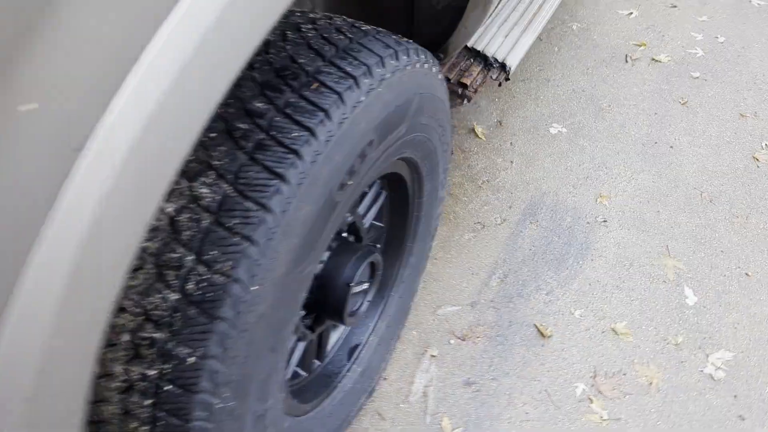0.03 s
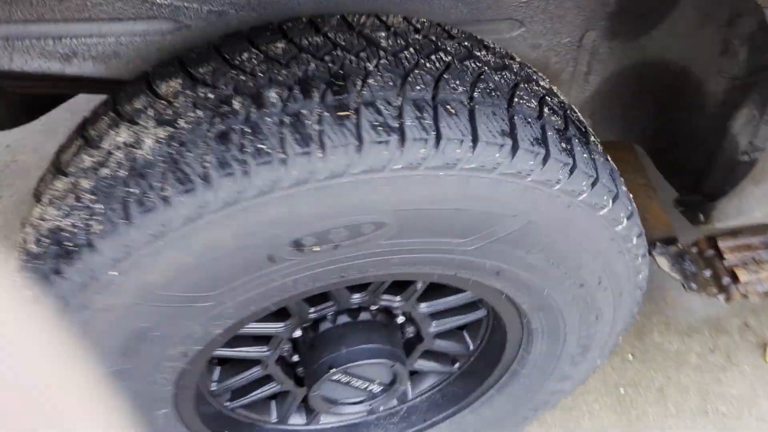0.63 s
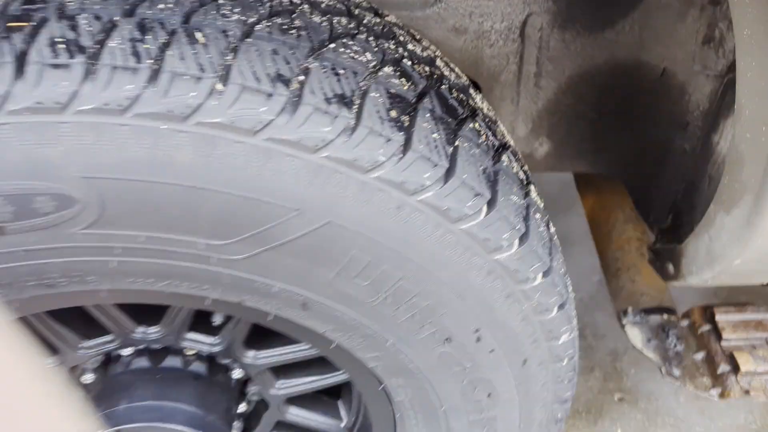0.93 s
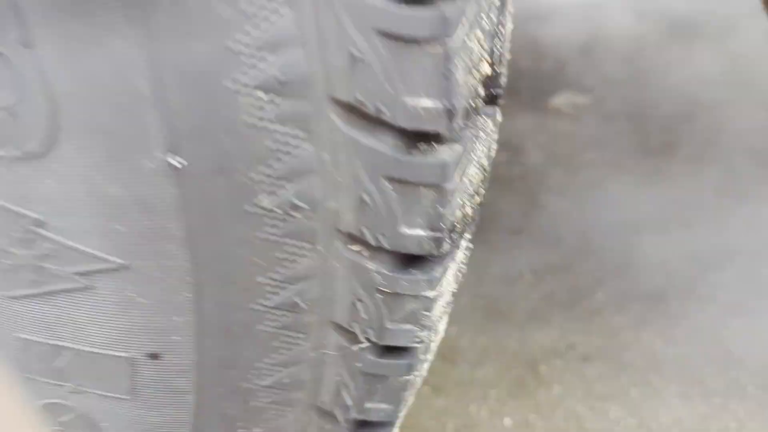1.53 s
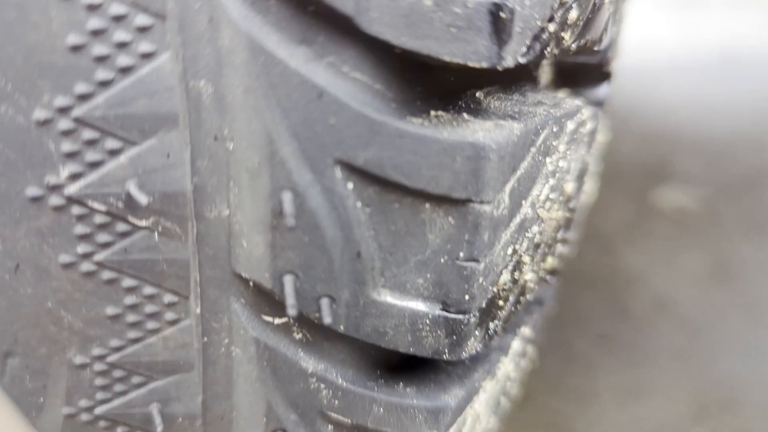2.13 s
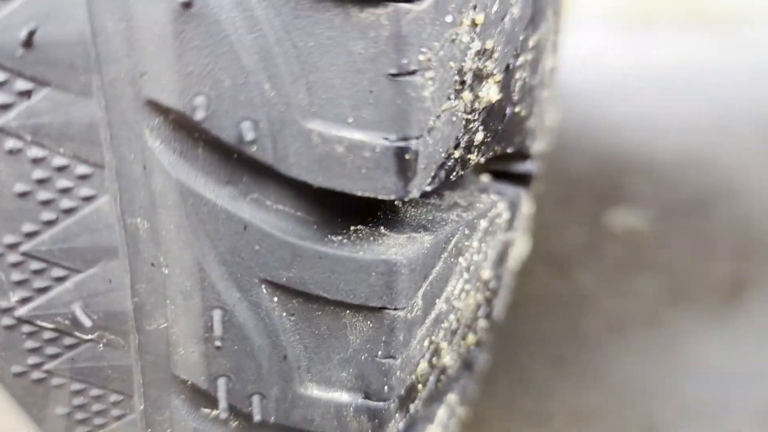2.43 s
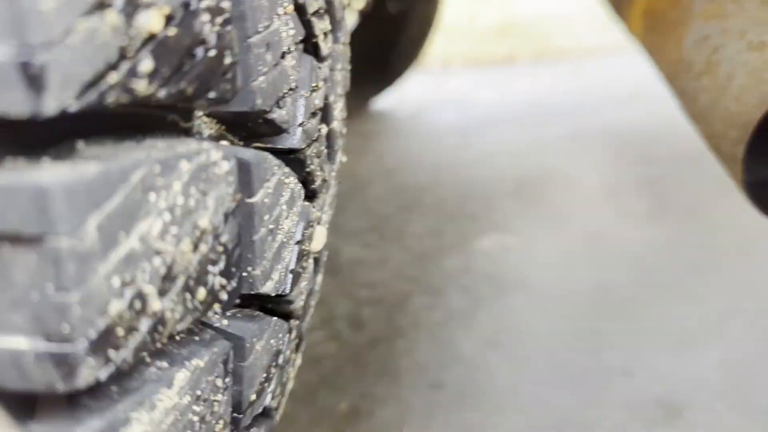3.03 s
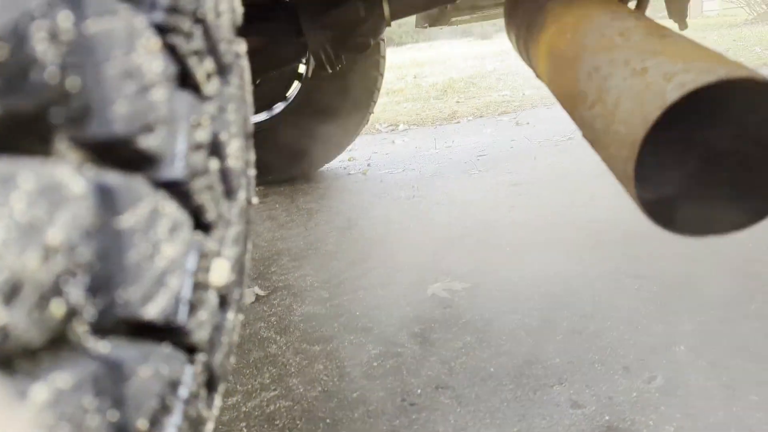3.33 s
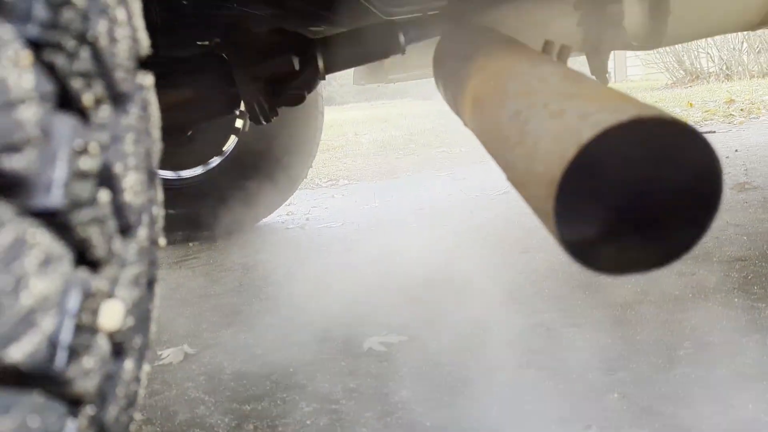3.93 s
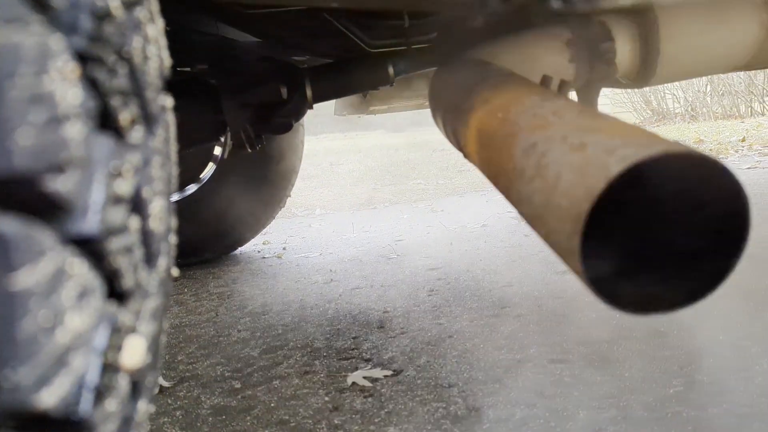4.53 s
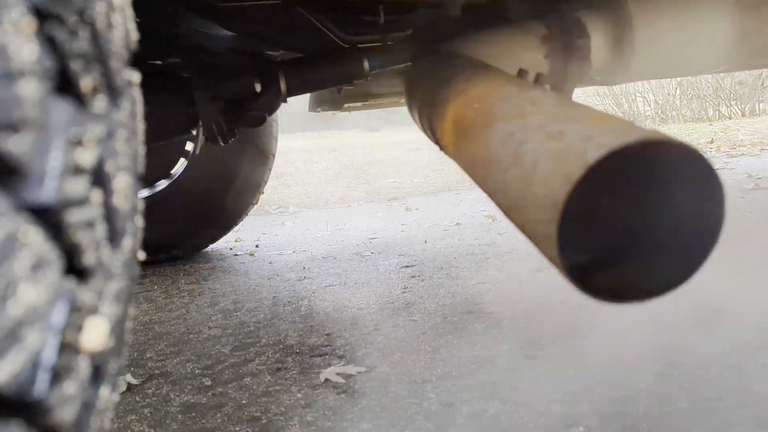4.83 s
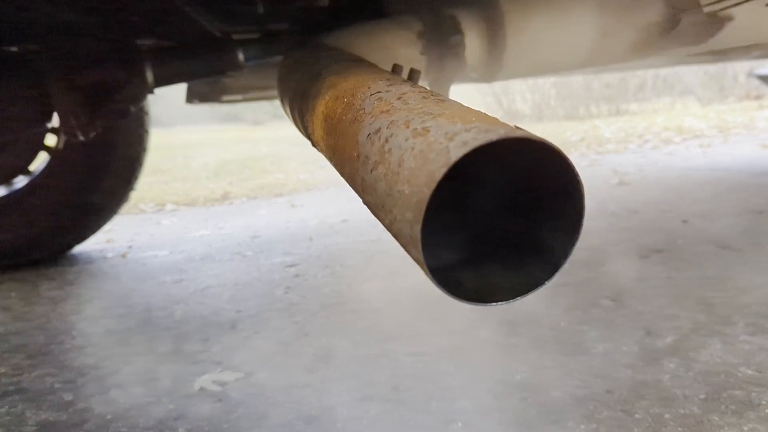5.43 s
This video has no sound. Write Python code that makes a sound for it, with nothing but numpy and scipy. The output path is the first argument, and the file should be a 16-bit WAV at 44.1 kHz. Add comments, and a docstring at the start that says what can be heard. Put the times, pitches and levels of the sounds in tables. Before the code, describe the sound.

A big petrol engine idles roughly outside, muffled at first beneath a few gusts on the microphone and light scuffs of clothes and shoes. As the hand-held microphone rounds the wheel and nears the exhaust, a deep, lopsided throb takes over, with throaty chuffs and a slight tinny ring from the steel pipe. Damp gas hisses and spits softly, and the misfire occasionally smooths out for a moment.

```python
"""Air buffets a hand-held microphone over the low throb of an idling ten-cylinder petrol engine.
Clothes and shoes scuff and grit ticks as the microphone moves past the rear wheel to the tailpipe.
One cylinder misfires: each missed firing leaves a hole in the pulse train that sets the silencer
booming, and the exhaust chuffs and pings; now and then the cylinder catches and the beat evens out.
Wet gas hisses and spits at the pipe mouth."""
import sys
import numpy as np
from scipy import signal
from scipy.fft import rfft, irfft, next_fast_len
from scipy.io import wavfile
from scipy.ndimage import uniform_filter1d, minimum_filter1d

SR = 44100
rng = np.random.default_rng(int(sys.argv[2]) if len(sys.argv) > 2 else 0)


def unload_wav(signal):
    """Save mono or channel-first audio to the path in sys.argv[1] as 16-bit WAV at rate SR, clipped to [-1, 1]."""
    wavfile.write(
        sys.argv[1],
        SR,
        np.round(np.clip(np.atleast_2d(signal).T, -1, 1) * 32767).astype(np.int16),
    )


N = 246959
TIME = np.arange(N) / SR
FFT_SIZE = next_fast_len(N + SR // 2)
FREQ = np.maximum(np.arange(FFT_SIZE // 2 + 1) * SR / FFT_SIZE, 1)

# The idle hunts a little. Each row: time in seconds, crankshaft speed in rpm.
IDLE_SPEED = [(0.0, 874.3), (0.78, 868.5), (0.83, 852.7), (1.77, 874.7), (2.27, 859.3), (2.97, 892.8),
              (3.44, 868.7), (3.85, 873), (4.21, 905), (4.36, 879), (5.03, 855.3), (5.3, 891.5)]
# Cylinders in firing order, the bad one first. Each row: pulse strength, manifold travel time in ms.
FIRING_ORDER = [(1.084, 2.8), (0.92, 3.96), (1.1, 3.1), (0.57, 3.36), (1.02, 3.96), (1.44, 3.52),
                (1.32, 2.996), (1.1, 2.806), (1.47, 2.06), (0.77, 2.35)]
# The bad cylinder catches. Each row: time in seconds, share that burns from 0 to 1.
CATCH_EVENTS = [(0, 0.98), (4.13, 0.85), (4.95, 0.44), (5.09, 0.29), (5.23, 0.92), (5.36, 0.86),
                (5.5, 0.22)]
# Standing waves of silencer and pipe. Each row: frequency in Hz, width in Hz, signed gain.
SILENCER_MODES = [(52.83, 11.1, 0.608), (65.2, 82, -0.4594), (84.56, 77.3, 0.3925), (141.9, 13.2, -0.14),
                  (190, 16.3, -0.09), (254.1, 14, -0.042), (249.6, 2.4, -0.049), (325, 13, 0.039)]
# The wheel shields the pipe mouth until the microphone rounds it.
# Each row: time in seconds, pulse level in dB, further gain of the deep bass in dB.
MOUTH_EXPOSURE = [(0, -23.5, -25), (.85, -21.5, -10.5), (1.33, -25, 0.5), (1.45, -11, 1.5), (1.7, -9, 5),
                  (2.2, -13.5, 5), (2.9, -8.5, 1), (3.6, -11.5, 3.5), (4.3, -8, 1.5), (5.0, -11.5, 4),
                  (5.6, -8.5, 8.5)]
# Surges in each cycle. Each row: firings after the bad one, half length in seconds, pitch in Hz,
# relative level in dB.
CHUFF_PATTERN = [(1.25, 0.0093, 312, -8), (3.5, 0.015, 309, -4.5), (7.4, 0.019, 297.7, -10),
                 (7.6, 0.0066, 528, -24), (9.4, 0.011, 228, -11)]
# Higher standing waves of the pipe. Each row: frequency in Hz, width in Hz, relative level in dB.
PIPE_MODES = [(486, 50, 0.5), (573.7, 14.5, 6), (772, 11.3, 0), (1120, 43, -13)]
# Gas at the mouth. Each row: time in seconds, relative levels of rush and of hiss in dB.
GAS_LEVELS = [(0.1, -47.5, -57.5), (0.4, -47.5, -52), (1.35, -42.5, -52.5), (1.44, -36, -46),
              (2.2, -43, -49), (3.4, -45, -53), (4.2, -45.5, -49.5), (5.6, -46.5, -50)]
# Spectra of the gas rush and spray hiss. Each row: frequency in Hz, relative level in dB.
RUSH_SPECTRUM = [(530, -13.5), (900, -19), (998, -11.5), (1260, -15), (1870, -10.5), (2940, -19.5),
                 (6000, -30), (7800, -59), (13200, -120)]
HISS_SPECTRUM = [(2350, -25), (4000, -10), (4690, -12.5), (5380, -10), (5890, -13.5), (6630, -4),
                 (7350, -8.5), (8370, -2.5), (9760, -7.5), (11600, -2), (12900, -3), (14800, -4),
                 (15600, -9)]
# Thin rings of the steel wall. Each row: frequency in Hz, width in Hz, dB over the rush.
WALL_MODES = [(1770, 75, -6), (1787, 69, -17), (2740, 4.1, 10), (3570, 18, -10), (3690, 6.3, 10)]
# Three puffs of spray a cycle. Each row: firings after the bad one, dB over the steady hiss.
SPRAY_PUFFS = [(1.6, 3), (7.5, 2), (9.2, 5.5)]
# Air striking the microphone. Each row: start in seconds, length in seconds, relative level in dB.
GUSTS = [(0.035, 0.12, -19.5), (0.118, 0.047, -12.5), (0.165, 0.13, -12.5), (0.287, 0.13, -13.5),
         (0.426, 0.01, -17), (0.448, 0.11, -15)]
# Spectrum of the buffeting. Each row: frequency in Hz, relative level in dB.
GUST_SPECTRUM = [(50, -10), (110, 3), (220, 3), (330, 2.5), (480, -11), (800, -27.5), (1500, -36.5),
                 (3000, -54.5)]
# Grit ticks, dull knocks and spits of water.
# Each row: start in seconds, level in dB, centre in Hz, width in Hz, decay time in seconds.
TICK_EVENTS = [(.122, -42, 527, 344, 0.006), (0.2446, -13, 497, 197, .006),
               (0.7782, -33.5, 5360, 302, 0.0065), (.777, -27.5, 12700, 5000, 0.0016),
               (0.995, -35.5, 6910, 5850, 0.0015), (1.677, -28, 820, 302, 0.007),
               (1.7948, -21.5, 1600, 1900, 0.0019), (1.85, -31, 8000, 7000, 0.0028),
               (1.924, -35, 5100, 9000, .003), (2.914, -31.5, 800, 200, 0.008),
               (2.991, -31, 550, 193, 0.0075), (3.232, -27, 544.7, 493, 0.0071),
               (3.247, -17.5, 480, 450, 0.0019), (3.369, -21.5, 430, 200, 0.0076),
               (3.642, -23.5, 420, 199.4, 0.013), (3.945, -22, 450, 280, 0.015)]
# Modes of the steel tailpipe. Each row: frequency in Hz, width in Hz, relative level in dB.
TAILPIPE_MODES = [(925, 15.2, -2), (1132, 30, -8), (1403, 34, -11), (1920, 50, -13.5), (2710, 20, -24),
                  (3490, 40, -23), (3820, 60, -35)]
# Strength of the tailpipe's ring. Each row: time in seconds, relative level in dB.
RING_LEVELS = [(0, -66), (1.25, -46), (1.5, -33), (2.1, -52), (3.0, -50), (3.3, -43), (5.6, -36)]
# Misfires that jolt the tailpipe harder. Each row: time in seconds, extra level in dB.
JOLT_ACCENTS = [(1.39, 5), (3.31, 5.5), (4.0, 5.5)]
# Shoes and clothes. Each row: start and length in seconds, level in dB, centre and width in Hz.
SCUFF_STROKES = [(0.298, 0.064, -33.5, 2050, 3410), (0.304, 0.046, -32, 9700, 11600),
                 (0.314, 0.15, -45.5, 5000, 9050), (0.726, 0.11, -43, 2020, 2320),
                 (0.742, 0.06, -41.5, 12200, 6150), (1.059, 0.24, -44.5, 4540, 6900),
                 (1.438, 0.035, -27, 1500, 880), (1.46, 0.22, -47, 3600, 5840),
                 (1.541, 0.07, -37, 6000, 3600), (1.703, 0.15, -44, 2000, 2500),
                 (2.023, 0.1, -48.5, 3020, 6070)]
# Bearing of the pipe as the microphone moves. Each row: time in seconds, left minus right in dB.
PIPE_BEARING = [(0, -8), (.7, 0), (1.35, -1), (2.1, -3.5), (4.2, -.5), (5.6, 0.5)]


def undb(db):
    """Decibels to amplitude gain."""
    return 10 ** (np.asarray(db) / 20)


def curves(table):
    """Each column of a table, interpolated linearly in time."""
    seconds, *columns = np.transpose(table)
    return [np.interp(TIME, seconds, column) for column in columns]


def unit(x):
    """Scale to rms 1."""
    return x / np.sqrt(np.mean(x ** 2))


def through(x, response):
    """Linear filtering: the spectrum is multiplied by a frequency response."""
    return irfft(rfft(x, FFT_SIZE) * response, FFT_SIZE)[..., :N]


def resonance(hz, width_hz):
    """Response of a damped oscillator, gain 1 at its centre."""
    return 1 / (1 + 1j * (FREQ ** 2 - hz ** 2) / (FREQ * width_hz))


def edge(hz, kind, order):
    """Response of a maximally flat low-pass or high-pass."""
    return signal.freqs(*signal.butter(order, hz, kind, analog=True), FREQ)[1]


def colour(points):
    """Response through (Hz, dB) points, falling away beyond both ends."""
    hz, db = np.transpose(points)
    band = abs(edge(hz[0] / 2, "high", 4) * edge(hz[-1] * 2, "low", 4))
    return undb(np.interp(np.log(FREQ), np.log(hz), db)) * band


def noise(shared):
    """Partly coherent white noise at the microphone's two ports."""
    common, left, right = rng.standard_normal((3, N))
    return np.sqrt(shared) * common + np.sqrt(1 - shared) * np.array([left, right])


def flicker(spread_db, hold):
    """A random gain, drawn anew every `hold` samples."""
    return undb(spread_db * rng.standard_normal(N // hold + 1)).repeat(hold)[:N]


def pulses(times, sizes):
    """One impulse at each time."""
    at = np.round(np.ravel(times) * SR).astype(int)
    inside = (at >= 0) & (at < N)
    return np.bincount(at[inside], np.ravel(sizes)[inside], N)


def swell(start, length):
    """An envelope that rises quickly, holds and dies away."""
    return np.interp((TIME - start) / length, [0, .12, .7, 1.25], [0, 1, .75, 0])


def per_cycle(events, arrivals):
    """Give each (seconds, value) event to the nearest engine cycle; the others get 0."""
    seconds, values = np.transpose(events)
    return np.bincount(abs(arrivals[:, :1] - seconds).argmin(axis=0), values, len(arrivals))


def crank(count=41):
    """Four-stroke timing: a cycle takes two turns; each pulse reaches the pipe after its travel time."""
    t = np.arange(N + SR) / SR
    cycles = np.cumsum(np.interp(t, *np.transpose(IDLE_SPEED))) / (120 * SR)
    starts = np.interp(np.arange(count + 1), cycles, t)
    phase = np.arange(len(FIRING_ORDER)) / len(FIRING_ORDER)
    travel_s = np.array(FIRING_ORDER)[:, 1] / 1000
    return starts, starts[:-1, None] + np.diff(starts)[:, None] * phase + travel_s


def misfires(arrivals, depth=1.4, scatter=0.43):
    """Failed combustion cuts a hole in each cycle; one deeper than the pulse sucks gas back."""
    holes = depth + scatter * rng.standard_normal(len(arrivals))
    return holes * (1 - np.clip(per_cycle(CATCH_EVENTS, arrivals), 0, 1))


def exhaust(arrivals, miss, unsteady_db=0.72, bark_hz=303, late_s=0.037, burble_hz=305):
    """Forced resonance: firing pulses drive the silencer, and a missing one excites its low boom."""
    sizes = np.array(FIRING_ORDER)[:, 0] * (1 + .08 * rng.standard_normal(arrivals.shape))
    sizes *= undb(unsteady_db * rng.standard_normal((len(arrivals), 1)))
    sizes[:, 0] -= miss
    train = pulses(arrivals + .00011 * rng.standard_normal(arrivals.shape), sizes)
    modes = sum(gain * resonance(hz, width) for hz, width, gain in SILENCER_MODES)
    muffling = edge(362, "low", 4) * abs(edge(256, "low", 8))
    low_cut = edge(45.8, "high", 3) * abs(edge(23, "high", 6))
    note = through(train, modes * muffling * low_cut)
    # when the bad cylinder does catch, it burns late and barks in the pipe
    caught = pulses(arrivals[:, 0] + late_s, np.clip(1 - miss, 0, 1))
    note += 0.45 * through(caught, resonance(bark_hz, 8) * resonance(bark_hz, 57))
    # no two firings have the same front, so the pipe burbles unevenly
    fronts = pulses(arrivals, rng.standard_normal(arrivals.shape))
    note += 0.021 * through(fronts, resonance(burble_hz, 34.6) * resonance(burble_hz, 50))
    level_db, bass_db = curves(MOUTH_EXPOSURE)
    bass = through(note, abs(edge(116.6, "low", 4)) ** 2)
    return (note + (undb(bass_db) - 1) * bass) * undb(level_db) / np.std(note)


def chuffs(starts, gain_db=1.83, follow=1.134, scatter_db=2.0, jitter_s=0.00047):
    """Uneven flow surges through the silencer in wave packets, heard as short, throaty chuffs."""
    out = 0
    for firing, half_s, hz, db in CHUFF_PATTERN:
        late, loud = rng.standard_normal((len(starts) - 1, 2)).T
        times = starts[:-1] + np.diff(starts) * firing / len(FIRING_ORDER) + jitter_s * late
        packet = SR * half_s * np.sqrt(np.pi) / 2 * np.exp(-(np.pi * half_s * (FREQ - hz)) ** 2)
        out = out + through(pulses(times, undb(db + scatter_db * loud)), packet)
    return out * undb(gain_db + follow * curves(MOUTH_EXPOSURE)[0])


def overtones(arrivals, miss, gain_db=-31, follow=0.53):
    """Broadband excitation: steep pulse fronts and turbulence ring the higher standing waves."""
    sizes = np.array(FIRING_ORDER)[:, 0] * undb(3 * rng.standard_normal(arrivals.shape))
    sizes[:, 0] *= np.clip(1 - miss, 0, 1)
    train = pulses(arrivals + 0.000047 * rng.standard_normal(arrivals.shape), sizes)
    modes = sum(undb(db) * resonance(hz, width) for hz, width, db in PIPE_MODES)
    ring = through(unit(train) + noise(shared=1), modes * edge(327, "high", 4) * edge(1100, "low", 3))
    return unit(ring) * undb(gain_db + follow * curves(MOUTH_EXPOSURE)[0])


def gas(starts, throb=0.16, puff_scatter_db=2.0, puff_half_firings=0.55):
    """Modulated flow noise: gas rushes with every firing and stirs the wall; spray hisses in puffs."""
    cylinders = len(FIRING_ORDER)
    firing = np.interp(TIME, starts, np.arange(len(starts))) * cylinders
    count = len(starts) * cylinders
    puff_db = puff_scatter_db * np.interp(firing, np.arange(count), rng.standard_normal(count))
    for at, db in SPRAY_PUFFS:
        away = (firing - at + cylinders / 2) % cylinders - cylinders / 2
        puff_db += db * np.exp(-(away / puff_half_firings) ** 2)
    wall = 1 + sum(undb(db) * resonance(hz, width) for hz, width, db in WALL_MODES)
    flow = noise(shared=0.045) * (1 + throb * np.cos(2 * np.pi * firing)) * undb(0.68 * puff_db)
    rush = unit(through(flow, colour(RUSH_SPECTRUM) * wall))
    droplets = flicker(spread_db=1.5, hold=32) * noise(shared=0.033)
    hiss = unit(through(droplets, colour(HISS_SPECTRUM)))
    rush_db, hiss_db = curves(GAS_LEVELS)
    return rush * undb(rush_db - 1) + hiss * undb(hiss_db + 1.5 + puff_db)


def buffets(left_db=-3, right_db=1):
    """Turbulent pressure: eddies of uneven strength thump on the ports as the microphone swings."""
    eddies = flicker(spread_db=2.5, hold=128) * noise(shared=0.11)
    air = unit(through(eddies, colour(GUST_SPECTRUM)))
    envelope = sum(undb(db) * swell(start, length) for start, length, db in GUSTS)
    return air * envelope * undb([[left_db], [right_db]])


def ticks():
    """Transient excitation: noise bursts each drive a resonance, bright for grit, dull for spits."""
    white, out = noise(shared=0.07), 0
    for start, db, hz, width, decay in TICK_EVENTS:
        body = resonance(hz, width) * edge(hz + 3 * width, "low", 3)
        burst = white * (TIME > start) * np.exp(-abs(TIME - start) / decay)
        out = out + undb(db) * through(burst, body / np.sqrt(np.mean(abs(body) ** 2)))
    return out


def tailpipe(arrivals, miss, gain_db=8.5, delay_s=.008, gap_s=0.0067, rattle=0.34, rise_hz=80):
    """Free vibration: jolted by a misfire, the steel tailpipe rattles four times and rings down."""
    knock = np.arange(4)
    chance = rng.random((len(arrivals), len(knock)))
    times = arrivals[:, :1] + delay_s + gap_s * (knock + chance - .5)
    jolt_db = np.interp(arrivals[:, 0], *np.transpose(RING_LEVELS)) + per_cycle(JOLT_ACCENTS, arrivals)
    jolt_db += rng.standard_normal(len(arrivals))
    jolt = np.clip(miss, 0, 1) * undb(jolt_db + gain_db)
    sizes = jolt[:, None] * rattle ** (knock / 2)
    modes = sum(undb(db) * SR / (2 * np.pi * width) * resonance(hz, width) * resonance(hz, rise_hz)
                for hz, width, db in TAILPIPE_MODES)
    return through(pulses(times, sizes), modes)


def tinkle(arrivals, miss, gain_db=-45, delay_s=0.01, rise_s=0.0086, above_hz=1700, skirt_hz=300):
    """Flow excitation: after a misfire, gas brushes the tailpipe's top modes into a faint, tinny ring."""
    sizes = miss * undb(rng.standard_normal(len(arrivals)))
    brush = through(pulses(arrivals[:, 0] + delay_s, sizes), 1 / (1 + 2j * np.pi * FREQ * rise_s) ** 2)
    modes = sum(undb(db) * resonance(hz, width) * resonance(hz, skirt_hz)
                for hz, width, db in TAILPIPE_MODES if hz > above_hz)
    return unit(through(brush * noise(shared=.1), modes)) * undb(gain_db + curves(MOUTH_EXPOSURE)[0])


def scuffs():
    """Friction noise: shoes and clothes rub in short, gritty strokes."""
    grit, out = noise(shared=.2) * flicker(spread_db=4, hold=64), 0
    for start, length, db, hz, width in SCUFF_STROKES:
        rub = unit(through(grit, resonance(hz, width) * edge(hz + width, "low", 2)))
        out = out + undb(db) * swell(start, length) * rub
    return out


def scene(port_lag_s=0.00021):
    """Superposition at two ports: the pipe lies to the right, so its sound reaches the left later."""
    starts, arrivals = crank()
    miss = misfires(arrivals)
    pipe = exhaust(arrivals, miss) + chuffs(starts) + overtones(arrivals, miss) + tailpipe(arrivals, miss)
    port_delays = np.exp(np.array([[-1], [1]]) * 1j * np.pi * FREQ * port_lag_s)
    pan_db = curves(PIPE_BEARING)[0]
    panned_pipe = through(pipe, port_delays) * undb(np.array([pan_db, -pan_db]) / 2)
    return panned_pipe + tinkle(arrivals, miss) + gas(starts) + buffets() + scuffs() + ticks()


def record(dry, ceiling=.94, top_hz=15550):
    """Look-ahead limiting holds the peaks; a steep low-pass cuts the top."""
    window = int(.008 * SR)
    gain = np.minimum(1, ceiling / (abs(dry).max(axis=0) + 1e-9))
    held = minimum_filter1d(gain, 2 * window)
    smooth = uniform_filter1d(uniform_filter1d(held, window), window)
    return signal.sosfilt(signal.ellip(10, .2, 80, top_hz, fs=SR, output="sos"), dry * smooth)


dry = scene()
out = record(dry)
unload_wav(out)
```